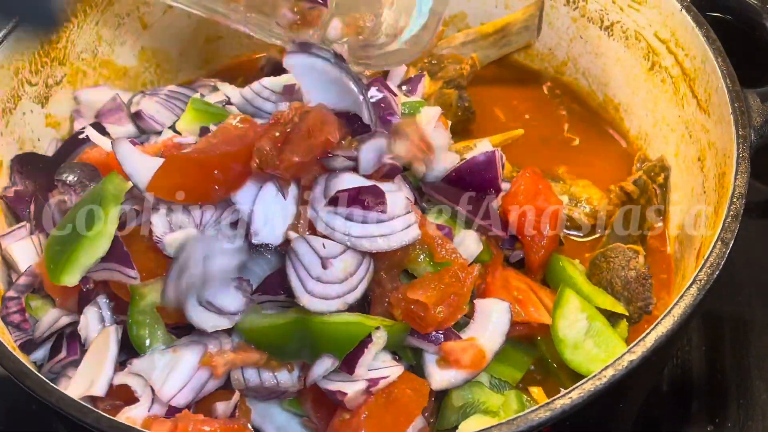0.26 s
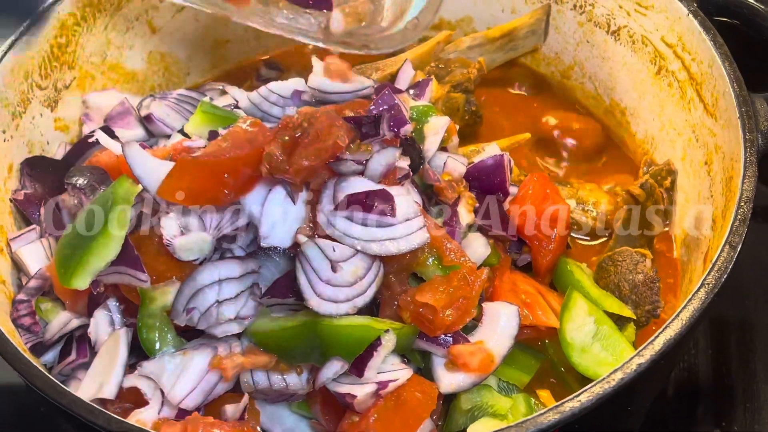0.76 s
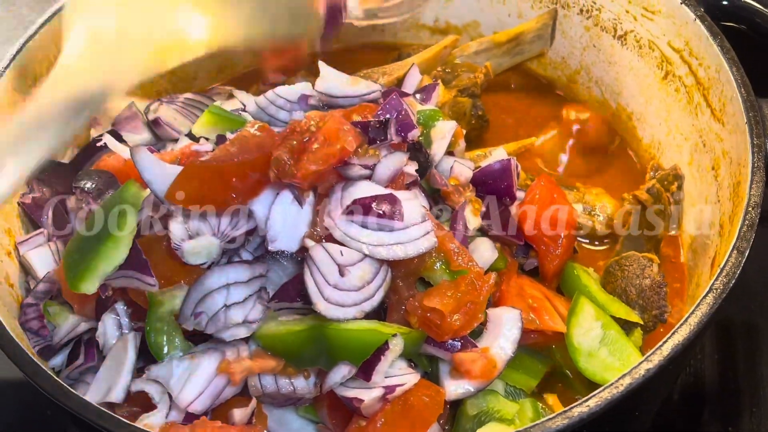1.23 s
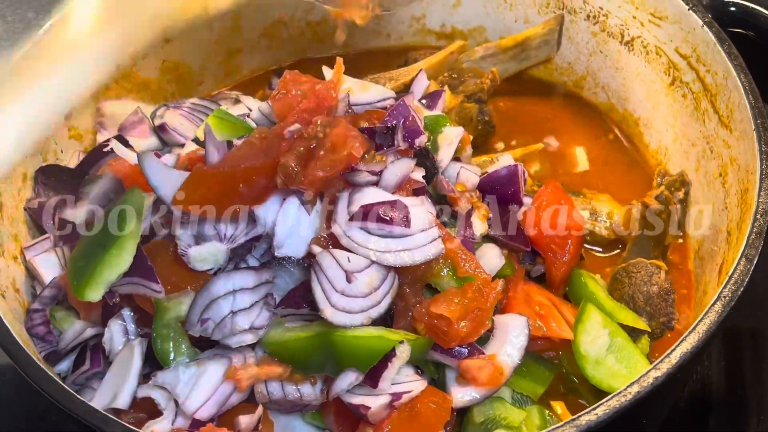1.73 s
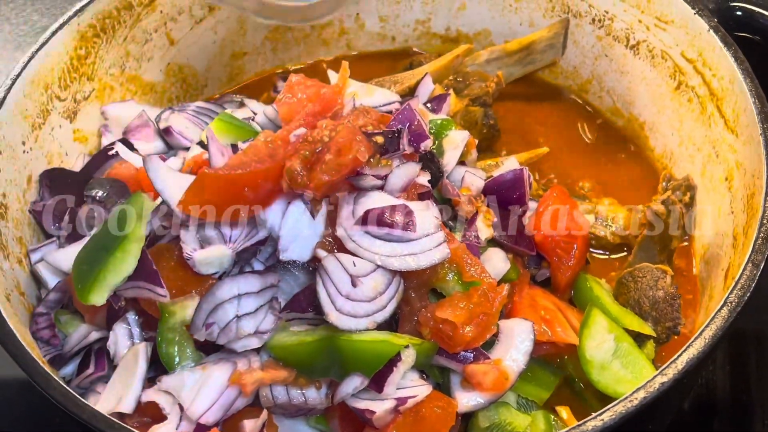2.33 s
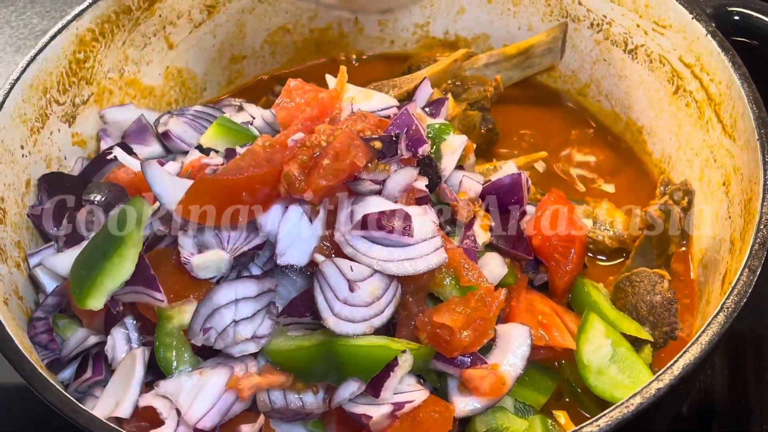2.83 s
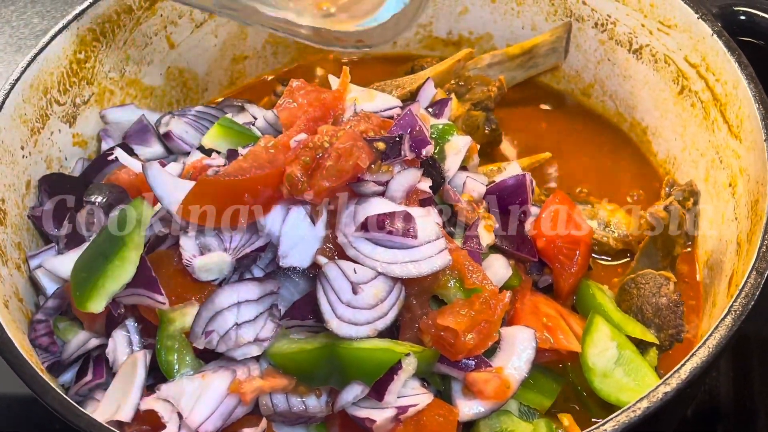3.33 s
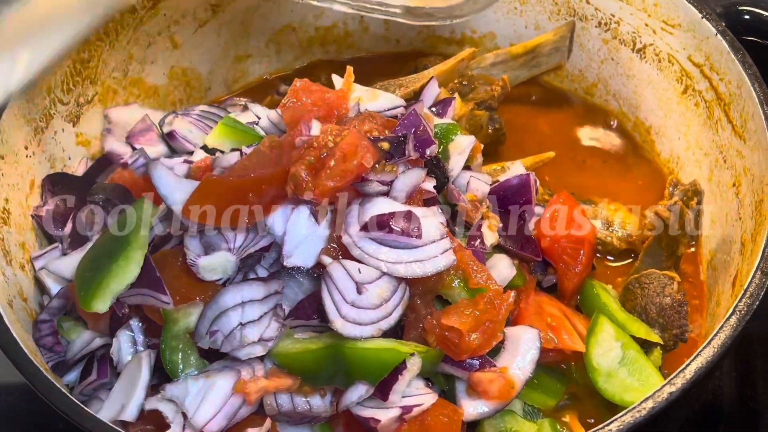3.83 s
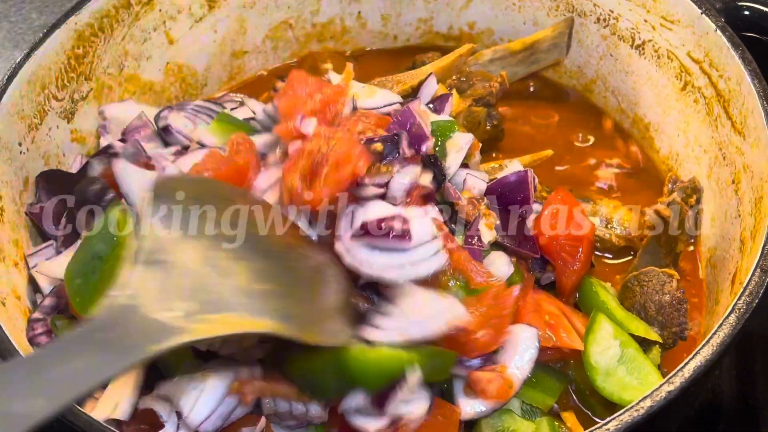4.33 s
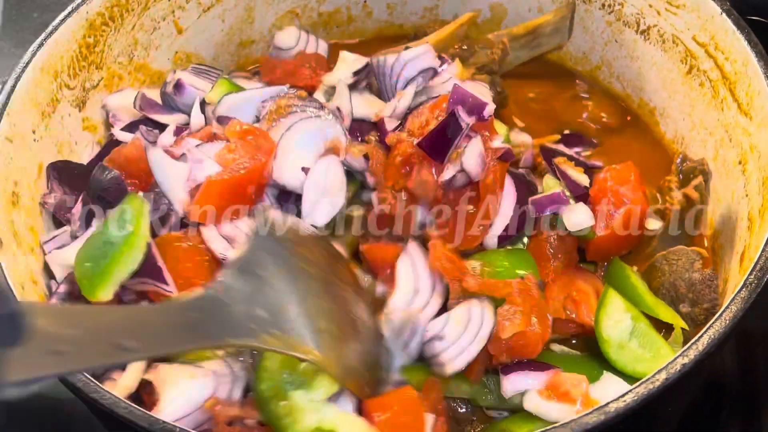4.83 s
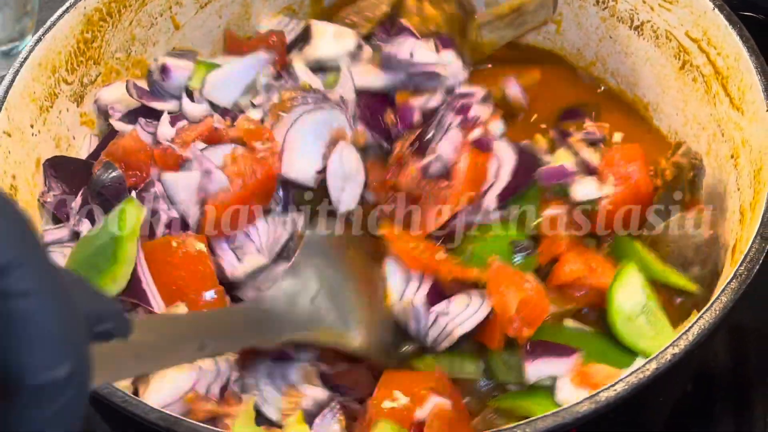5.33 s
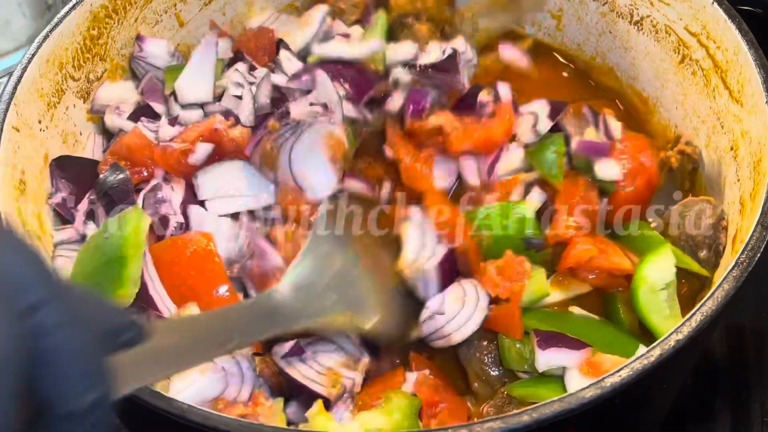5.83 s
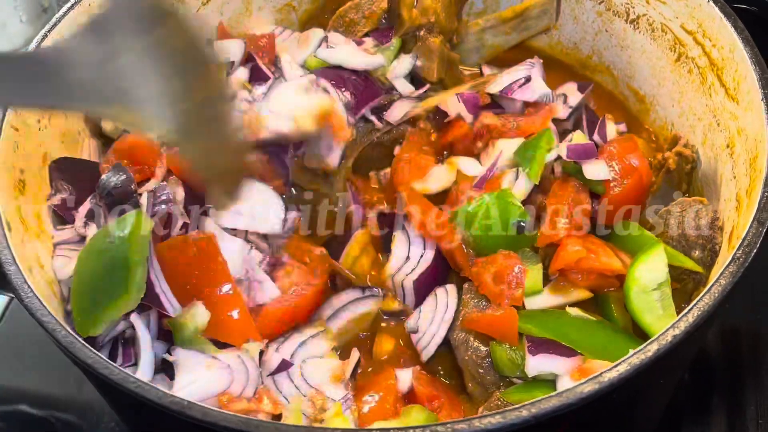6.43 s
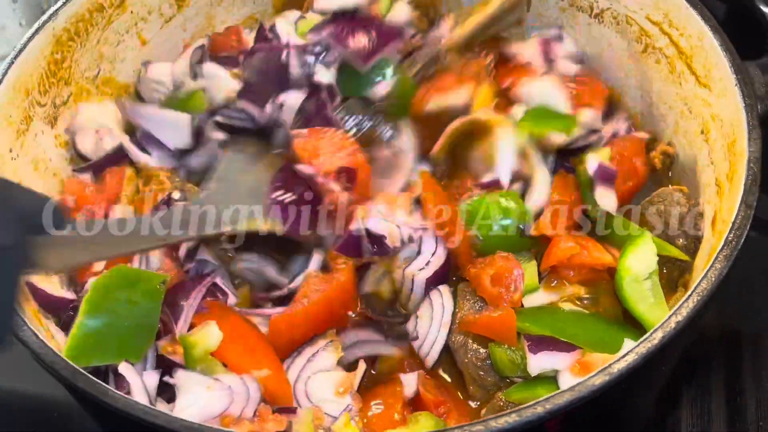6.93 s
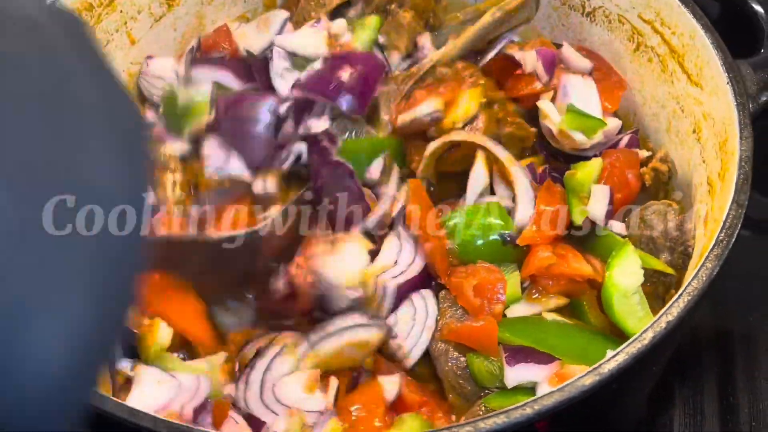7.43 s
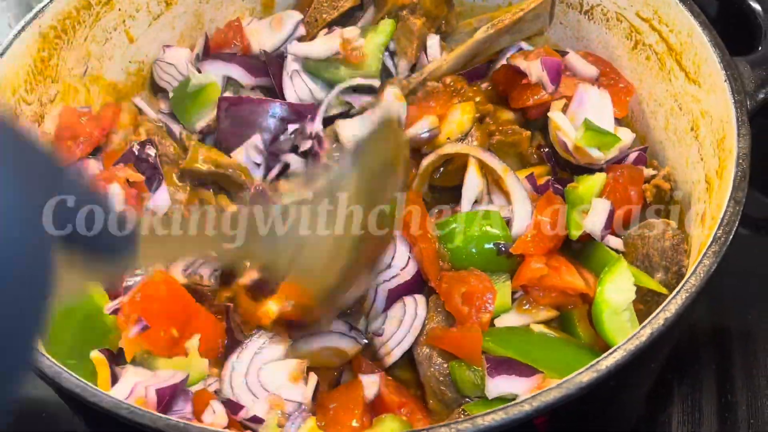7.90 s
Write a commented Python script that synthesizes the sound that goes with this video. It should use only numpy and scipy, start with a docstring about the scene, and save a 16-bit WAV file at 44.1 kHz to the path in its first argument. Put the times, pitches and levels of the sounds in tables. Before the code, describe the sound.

Thick stew bubbles and fizzes while a steel ladle knocks and squeaks on a glass bowl, then stirs wetly with clacks and dull pot thumps.

```python
"""Thick stew bubbles and fizzes in a heavy pot over a low drone, heard from just above the rim.
A steel ladle knocks, rubs and squeaks on a hand-held glass bowl: struck modes and resonant noise.
It then stirs in the last vegetables: grainy wet noise, short clacks on the pot,
and two dull low bumps as the pot rocks and drags. A small kitchen answers with decaying noise."""
import sys
import numpy as np
from scipy import signal
from scipy.fft import rfft, irfft, next_fast_len
from scipy.io import wavfile
from scipy.ndimage import uniform_filter1d, map_coordinates

SR = 44100
rng = np.random.default_rng(int(sys.argv[2]) if len(sys.argv) > 2 else 0)


def materialize(psi):
    """Save the field psi as 16-bit PCM at rate SR to the path in sys.argv[1].

    A 1-D psi becomes a single channel; in a 2-D psi each row is a channel.
    """
    bounded = np.clip(np.atleast_2d(psi).T, -1, 1)
    quanta = np.round(bounded * 32767).astype(np.int16)
    wavfile.write(sys.argv[1], SR, quanta)


N = 359843


def amp(db):
    """Decibels to gain."""
    return 10 ** (np.asarray(db) / 20)


def unit(x):
    """Scale to rms 1."""
    return x / np.sqrt(np.mean(x ** 2) + 1e-20)


def crest(x):
    """Scale so that the loudest 4 ms have rms 1."""
    return x / np.sqrt(uniform_filter1d(x * x, size=176).max() + 1e-20)


def noise(n):
    """White noise of n samples."""
    return rng.standard_normal(n)


def along(points, hz):
    """Read (frequency [Hz], value) points on a log frequency axis."""
    f, v = np.transpose(points)
    return np.interp(np.log(hz + 1), np.log(f + 1), v)


def curves(rows):
    """One value per sample for each column after the time."""
    s, *cols = np.transpose(rows)
    return [np.interp(np.arange(N) / SR, s, c) for c in cols]


def wobble(rate, size):
    """A smooth random curve with rate knots a second."""
    knots = noise(int(size * rate / SR) + 4)
    return map_coordinates(knots, [np.arange(size) * rate / SR])


def filtered(x, response):
    """Shape x by a response given as a function of frequency."""
    n = x.shape[-1]
    m = next_fast_len(n + 8192)
    return irfft(rfft(x, m) * response(np.fft.rfftfreq(m, 1 / SR)), m)[..., :n]


def coloured(x, spectrum):
    """x shaped by a relative spectrum, at rms 1."""
    return unit(filtered(x, lambda hz: amp(along(spectrum, hz))))


def resonant(x, peaks):
    """x through parallel (centre [Hz], width [Hz], level [dB]) resonances, at rms 1."""
    def response(f):
        total = 0
        for k, (centre, width, db) in enumerate(peaks):
            damping = 1j * f * width
            # alternate signs between successive peaks
            total = total + (-1) ** k * amp(db) * damping / (centre * centre - f * f + damping)
        return total
    return unit(filtered(x, response))


def fade(t, t60):
    """Exponential decay, 60 dB down after t60 seconds."""
    return np.exp(-np.log(1000) * t / t60)


def add(track, s, x):
    """Mix x into the track at time s."""
    part = track[max(round(s * SR), 0):][:len(x)]
    part += x[:len(part)]


# stove and kitchen drone over time: (time [s], level [dB])
DRONE_LEVEL = [(0, -53), (1.35, -53), (2.2, -58.5), (3.0, -63), (4.4, -59), (6.4, -60), (8.16, -58.5)]
# colour of the drone: (frequency [Hz], relative density [dB per Hz])
HUM_SPECTRUM = [(20, -21.5), (45, -9.5), (65, -10.5), (100, 2.5), (125, 1.5), (160, -12), (330, -9),
                (700, -24.5), (1500, -39.5), (5000, -27.5), (15000, -53.5)]


def drone():
    """Steady low-heavy noise whose level drifts."""
    return amp(curves(DRONE_LEVEL)[0]) * coloured(noise(N), HUM_SPECTRUM)


def bubble(t, hz, cycles, glide):
    """A bubble rings for some cycles, its pitch rising as it opens."""
    age = t * hz / cycles
    ring = np.sin(2 * np.pi * hz * t * (1 + glide * np.minimum(age, 1)))
    return ring * fade(age, 1.0) * (1 - np.exp(-t * hz))


def bubbles(per_second, hz, spread, cycles, size_db):
    """A random stream of bubbles scattered around one pitch, at rms 1."""
    count = int(per_second * N / SR)
    when, pitch, size = rng.random((count, 3)).T[:, :, None]
    pitch = np.clip(hz * (pitch / (1 - pitch)) ** spread, 200, 9000)
    n = np.arange(SR // 40)
    gain = amp(size_db * np.minimum(-np.log(size), 3))
    waves = gain * bubble(n / SR, pitch, cycles, glide=0.041)
    places = (when * N).astype(int) + n
    return unit(np.bincount(places.ravel(), waves.ravel(), N)[:N])


# colour of the fizz: (frequency [Hz], relative density [dB per Hz])
FIZZ_SPECTRUM = [(300, -26), (1500, -3.5), (3000, 10), (6000, -1), (9000, 8.5), (11500, 4), (13000, -19.5),
                 (16000, -37.5)]


def crackle(per_second, size_db):
    """Tiny films burst as short noise clicks of uneven size, at rms 1."""
    size = amp(size_db * np.minimum(rng.exponential(size=N), 4))
    clicks = (rng.random(N) < per_second / SR) * size
    t = np.arange(SR // 100) / SR
    power = signal.fftconvolve(clicks ** 2, fade(t, 0.0011) ** 2)[:N]
    return coloured(np.sqrt(np.abs(power)) * noise(N), FIZZ_SPECTRUM)


FIZZ_DB, FIZZ_FOLLOWS = -65.5, 0.83  # fizz at average bubbling; its dB per dB of bubbling
SURGE_DB, SURGES_PER_S = 3, 3.1  # depth and knot rate of the random coming and going of the boil
GULP_DB, GULP_HZ = -9, 320  # deep bubbles heaving under the vegetables
# the cold vegetables calm the boil: (time [s], bubbling level before the surges [dB])
BOIL_LEVEL = [(0, -48.5), (1.0, -52), (2.4, -53), (4.1, -59.5), (5.3, -58), (6.3, -64.5), (7.0, -62.5),
              (8.16, -66)]
# colour of the seething sauce: (frequency [Hz], relative density [dB per Hz])
SAUCE_SPECTRUM = [(100, -12.5), (250, 2), (500, -5.5), (800, 17), (1400, -26), (2500, -9.5), (5000, -25),
                  (12000, -69.5)]


def simmer():
    """Thick sauce bubbles in clusters and spits in puffs, while its edge fizzes on the hot wall."""
    bubbling_db = curves(BOIL_LEVEL)[0] + SURGE_DB * wobble(SURGES_PER_S, size=N)
    fizz_db = FIZZ_DB + FIZZ_FOLLOWS * (bubbling_db - bubbling_db.mean())
    cluster = amp(2.5 * wobble(22, size=N))
    large = bubbles(per_second=150, hz=800, spread=.27, cycles=11, size_db=5.5)
    small = bubbles(per_second=150, hz=1500, spread=.2, cycles=13, size_db=6)
    tiny = bubbles(per_second=90, hz=2700, spread=.17, cycles=12, size_db=7)
    spit = resonant(noise(N), [(1100, 900, 0), (2300, 1400, -5)])
    puffs = unit(amp(6 * wobble(90, size=N)) * spit)
    gulps = bubbles(per_second=60, hz=GULP_HZ, spread=.15, cycles=8, size_db=4)
    seethe = coloured(noise(N), SAUCE_SPECTRUM)
    fizz = crackle(per_second=670, size_db=5.0)
    popping = amp(-4.5) * large + amp(-3.5) * small + amp(-11) * tiny + amp(-9) * puffs
    boil = cluster * popping + amp(GULP_DB) * gulps + amp(-8) * seethe
    return amp(bubbling_db) * boil + amp(fizz_db) * fizz


# big bubbles and sucking pops in the sauce:
# (time [s], level before an 8.5 dB trim [dB], nominal pitch [Hz])
SAUCE_PLOPS = [(0.064, -30.5, 847), (0.098, -28.5, 1590), (0.155, -31, 1010), (0.196, -33, 2290),
               (0.632, -30.5, 960), (1.095, -32.5, 1270), (1.291, -36, 730), (1.642, -31.5, 820),
               (1.716, -28, 836), (1.793, -30, 720), (2.277, -37.5, 2050), (2.434, -40, 1250),
               (2.825, -35, 1010), (2.862, -41, 930), (3.735, -37, 775), (4.224, -38.5, 680),
               (4.365, -32.5, 910), (4.392, -32, 1223), (4.688, -36, 980), (4.709, -40, 976),
               (4.785, -38.5, 760), (4.975, -36.5, 1038), (6.261, -42, 1430), (6.445, -40, 716),
               (6.464, -39, 680), (6.827, -33, 1113), (6.999, -37, 950), (8.135, -32, 1060),
               (8.148, -29, 1290)]


def plops():
    """Single large bubbles burst: a gliding ring with a small wet spray of noise."""
    out, t = np.zeros(N), np.arange(SR // 10) / SR
    for s, db, hz in SAUCE_PLOPS:
        spray = fade(t, 0.15) * resonant(noise(len(t)), [(hz, 0.5 * hz, 0)])
        ring = bubble(t, hz * .97, cycles=40, glide=.1)  # starts flat of the nominal pitch and rises
        add(out, s, amp(db - 8.5) * (crest(ring) + amp(-7) * crest(spray)))
    return filtered(out, lambda hz: 1 / (1 + (hz / 7000) ** 6))  # thick sauce softens the burst


SHIMMER_DB, SHIMMER_T60_S = -7, .15  # weak upper modes, relative to the free ring
# colour of a contact's crack: (frequency [Hz], relative density [dB per Hz])
CRACK_SPECTRUM = [(100, -15), (400, -10.5), (700, 3.5), (1100, -3.5), (2500, 0.5), (6000, -1), (9000, 3),
                  (11500, 5.5), (13000, -16), (16000, -22)]


def strike(modes, levels, ring_hz, ring_db, ring_t60, damped_t60, free_db, crack_db, crack_t60, rise):
    """One contact: modes die fast under the ladle, then ring on faintly; each spot differs in colour."""
    t = np.arange(SR // 2) / SR
    hz, db, t60 = np.transpose(modes)[:, :, None]
    size = amp(db + 4 * rng.standard_normal(hz.shape))
    loaded = hz * (1 + 0.0093 * rng.standard_normal(hz.shape))  # the touching ladle detunes the modes
    phase = 2 * np.pi * rng.random(hz.shape)
    damped = fade(t, damped_t60) * np.sin(2 * np.pi * loaded * t + phase)
    # the rim is not quite round, so each free mode beats with a close twin
    twin = np.cos(2 * np.pi * (hz * t * rng.random(hz.shape) / 300 + rng.random(hz.shape)))
    free = amp(free_db) * twin * fade(t, t60) * np.sin(2 * np.pi * hz * t + phase)
    # countless weak modes merge into a crack and a faint shimmer
    crack_decay = fade(t, crack_t60) + amp(free_db + SHIMMER_DB) * fade(t, SHIMMER_T60_S)
    crack = amp(crack_db) * crack_decay * coloured(noise(len(t)), CRACK_SPECTRUM)
    ring_tone = resonant(noise(len(t)), [(ring_hz, ring_hz * 0.015, 0)])
    ring = amp(ring_db) * crest(fade(t, ring_t60) * ring_tone)
    blow = (crest(np.sum(size * (damped + free), 0)) + crack + ring) * (1 - np.exp(-t / rise))
    parts = []
    for band in [(120, 1400), (1400, 4800), (4800, 16000)]:  # body, mid-range, brightness
        sos = signal.butter(2, band, "band", fs=SR, output="sos")
        parts.append(crest(signal.sosfilt(sos, blow)))
    return amp(levels) * [1, -1, 1] @ np.array(parts)  # neighbouring bands add with opposite sign


GLASS_CRACK_DB = -4  # the crack of a tap, relative to the modes
# ladle on the glass bowl: (time [s], mid-range level [dB], body relative to it [dB],
# brightness relative to it [dB], strongest ring [Hz])
BOWL_TAPS = [(0.273, -24, 6.5, 13, 2100), (0.298, -27, 4.5, 16, 8660), (0.403, -35.5, -3.5, 8.5, 9290),
             (0.518, -30.5, -5.5, 3, 4023), (0.734, -31, 9, 18, 6556), (0.748, -26, -2.5, -2.5, 2030),
             (0.827, -29, 4.5, 14, 9100), (0.895, -34.5, 6, 19.5, 9105), (1.434, -19, 4, 5.5, 3290),
             (1.469, -27, -3.5, 16, 8510), (1.493, -35, -14, -3.5, 2060), (1.947, -25, -4.5, 12, 6286),
             (2.054, -21.5, -12.5, 8, 3800), (2.231, -35, -11, 0.5, 2100), (2.51, -20.5, -9.5, 5.5, 4540),
             (2.907, -18.5, -6, 5, 2050), (2.932, -20.5, 0.5, 0, 6080), (3.079, -23, -12, 12.5, 6507),
             (3.374, -38.5, 8, 17.5, 7040), (3.414, -20.5, -7.5, 4.5, 6695), (3.614, -41.5, 4, 5, 1982),
             (3.933, -17.5, -2.5, 0, 3370), (3.956, -17.5, -19, 2.5, 2053),
             (4.078, -39.5, -3.5, -5.5, 3140)]
# modes of the glass bowl: (frequency [Hz], relative level [dB], t60 of the free ring [s])
GLASS_MODES = [(640, -5, .1), (770, 0, .14), (1230, -10, .2), (1641, 1.5, .38), (2034, 2, .47),
               (2400, -6, .15), (2720, -1, .24), (3310, 0, .23), (3827, -4, .44), (4082, -2, .42),
               (4410, -8, .3), (4502, -4, .3), (5130, -6, .25), (5221, -4, .34), (5470, -8, .22),
               (6240, 1, .14), (6650, -2, .2), (6790, -5, .2), (7219, -1, .34), (7490, -6, .25),
               (7860, -3, .22), (8330, -5, .22), (8473, -4, .28), (9006, 0, .26), (9570, -5, .22),
               (10940, -2, .2)]
# ladle rubbing along the glass: (centre time [s], level [dB], half length [s])
GLASS_RUBS = [(0.32, -41, 0.043), (1.193, -38.5, 0.018), (2.504, -33, 0.0061), (2.688, -33, 0.028),
              (3.583, -39, 0.025), (3.679, -44.5, 0.013)]
# the rubbing catches and squeaks: (centre time [s], level [dB], half length [s], pitch [Hz])
GLASS_SQUEAKS = [(0.317, -30.5, .012, 2730), (0.369, -28.5, .02, 2760), (0.848, -33, .012, 2700),
                 (1.18, -43.5, .02, 3480), (1.188, -42.5, .024, 2120), (2.505, -32.5, .006, 6080),
                 (2.63, -45.5, .018, 2170), (2.68, -32, 0.014, 2710), (2.705, -35.5, 0.026, 2050)]


def bowl():
    """Knocks excite the glass modes; rubbing feeds them noise, and squeaks are wavering tones."""
    out, t = np.zeros(N), np.arange(N) / SR
    for s, db, body_db, bright_db, hz in BOWL_TAPS:
        levels = (db + body_db, db, db + bright_db)
        tap = strike(GLASS_MODES, levels, hz, ring_db=-7, ring_t60=0.054, damped_t60=0.061,
                     free_db=-20.5, crack_db=GLASS_CRACK_DB, crack_t60=0.068, rise=0.00071)
        add(out, s + 0.0015, tap)
    # rubbing favours the low modes by 4 dB an octave
    peaks = [(hz, 35, db - 4 * np.log2(hz / 1000)) for hz, db, _ in GLASS_MODES]
    rub = resonant(noise(N), peaks)
    out += rub * sum(amp(db) * np.exp(-((t - s) / half) ** 2) for s, db, half in GLASS_RUBS)
    for s, db, half, hz in GLASS_SQUEAKS:
        swell = signal.windows.hann(int(4 * half * SR))
        # uneven stick and slip shakes the pitch
        pitch = hz * (1 + wobble(300, size=len(swell)) / 60)
        tone = unit(np.sin(2 * np.pi * np.cumsum(pitch) / SR))
        add(out, s - 2 * half, amp(db) * swell * tone)
    return out


PUSH_T60_S, PUSH_HZ = .05, 450  # a push dies fast and has no treble
# heavy taps push air below the vessel: (time [s], level [dB])
AIR_PUSHES = [(.300, -29), (.829, -38.5), (.897, -33), (1.947, -35.5), (2.054, -25.5), (2.513, -39),
              (2.936, -36.5), (3.417, -41.5), (6.721, -37)]


def pushes():
    """A heavy tap shoves the whole vessel: one low puff of air."""
    out, t = np.zeros(N), np.arange(SR // 4) / SR
    low_band = signal.butter(2, [75, PUSH_HZ], "band", fs=SR, output="sos")
    for s, db in AIR_PUSHES:
        jolt = fade(t, PUSH_T60_S) * noise(len(t))
        add(out, s, amp(db) * crest(signal.sosfilt(low_band, jolt)))
    return out


CLACK_BODY_DB = -2  # the body of every clack, relative to its mid-range
# ladle on the pot and on crisp vegetables:
# (time [s], mid-range level [dB], brightness relative to it [dB], strongest ring [Hz])
POT_CLACKS = [(1.305, -42, -23, 1904), (1.846, -41.5, -21, 3250), (4.44, -47.5, 2, 4050),
              (4.46, -35.5, -8.5, 1220), (4.607, -53.5, -15, 1390), (4.775, -49.5, -3.5, 2120),
              (4.866, -48, -5, 2980), (5.274, -21, -4, 2093), (5.56, -46.5, -6, 1780),
              (5.582, -26.5, -7, 3280), (5.911, -43, -9, 2300), (5.946, -36.5, -10, 3510),
              (6.221, -48.5, -19, 2710), (6.312, -57.5, 4, 2820), (6.556, -47, -1.5, 2090),
              (6.679, -40, 0, 2230), (6.722, -15.5, -7.5, 1513), (7.003, -51, 3, 1500),
              (7.064, -56, -5, 990), (7.137, -43, 1.5, 2720), (7.294, -45, -16, 1630),
              (7.478, -53, -8, 1760), (7.72, -42, -25, 3050), (7.741, -44.5, -28, 2600)]
# modes of the cast pot, damped by the stew: (frequency [Hz], relative level [dB], t60 [s])
POT_MODES = [(607, -5.5, 0.27), (668, 1, 0.13), (978, -3, 0.068), (1279, -3, 0.18), (1810, 0, 0.023),
             (2000, -10, 0.021), (2730, 8, 0.022), (3410, 4.5, .06), (5080, -12.5, .05)]


def ladle():
    """Short clacks of steel excite the quickly damped modes of the filled pot."""
    out = np.zeros(N)
    for s, db, bright_db, hz in POT_CLACKS:
        levels = (db + CLACK_BODY_DB, db, db + bright_db)
        clack = strike(POT_MODES, levels, hz, ring_db=1.0, ring_t60=0.017, damped_t60=0.032,
                       free_db=-9, crack_db=7.5, crack_t60=0.023, rise=0.00054)
        add(out, s + 0.00023, clack)
    return filtered(out, lambda hz: 1 / (1 + (hz / 12000) ** 8))  # sauce on the ladle dulls the top


DIP_FALL_S, DIP_BELOW_HZ = .03, 800
# the bass drops away briefly and creeps back: (time [s], nominal depth [dB], recovery [s])
BASS_DIPS = [(1.49, 9, .2), (2.085, 21, .24), (2.54, 15, .3)]


def dipped(x):
    """x with its bass falling away and recovering at each dip."""
    t = np.arange(N) / SR
    loss_db = np.zeros(N)
    for s, depth_db, recovery in BASS_DIPS:
        fall = np.clip((t - s) / DIP_FALL_S, 0, 1)
        loss_db += depth_db * fall * np.exp(-((t - s) / recovery) ** 2)
    bass = filtered(x, lambda hz: 1 / (1 + (hz / DIP_BELOW_HZ) ** 4))
    return x + (amp(-loss_db) - 1) * bass


RUSTLE_HZ, RUSTLE_WIDTH_HZ = 5200, 2100  # onion layers brushing past each other
SNAPS_PER_S, SNAP_DB = 39, -9.5  # crisp pieces giving way during a slide
# the ladle slides through wet vegetables: (time [s], level before a 7 dB trim [dB], rise [s],
# t60 [s], centre [Hz], crisp rustle relative to the slide [dB])
WET_SLIDES = [(4.28, -51.5, 0.0092, .1, 2910, -13.5), (4.42, -46, 0.018, 0.4, 1420, 0),
              (4.679, -39.5, 0.018, 0.14, 1370, -19), (5.92, -48, 0.032, 0.89, 1410, -14),
              (6.535, -46, .028, 0.098, 1920, -10), (6.68, -32.5, 0.0057, 0.34, 2130, -7),
              (6.84, -39.5, .07, 0.39, 944, -14), (7.139, -39.5, 0.015, 0.16, 2670, -10),
              (7.17, -38, 0.032, 0.34, 1180, -28), (7.35, -47.5, 0.073, 0.27, 1240, -6),
              (7.968, -36, .0013, 0.25, 5170, -10), (8.09, -46.5, .047, 0.49, 1160, -12)]


def stirring():
    """Each slide is a lumpy rush of wet noise, with rustle and snaps, that swells and drains away."""
    out, t = np.zeros(N), np.arange(int(.7 * SR)) / SR
    for s, db, rise, t60, hz, rustle_db in WET_SLIDES:
        lumps = amp(3.5 * wobble(300, size=len(t)) + 3.5 * wobble(50, size=len(t)))
        wet = resonant(lumps * noise(len(t)), [(hz, .3 * hz, 0)])
        crisp = resonant(lumps * noise(len(t)), [(RUSTLE_HZ, RUSTLE_WIDTH_HZ, 0)])
        breaks = (rng.random(len(t)) < SNAPS_PER_S / SR) * rng.random(len(t)) ** 2
        bursts = signal.fftconvolve(breaks, fade(t, 0.011))[:len(t)]
        snaps = resonant(bursts * noise(len(t)), [(2380, 2300, 0)])
        grains = wet + amp(rustle_db) * crisp + amp(SNAP_DB) * snaps
        # thin out the bass below 500 Hz and close the top above 11 kHz
        rush = unit(filtered(grains, lambda f: f ** 2 / (f ** 2 + 500 ** 2) / (1 + (f / 11000) ** 12)))
        swell = (1 - np.exp(-t / rise)) * fade(t, t60)
        add(out, s, amp(db - 7) * rush * swell / swell.max())
    return out


STOVE_RING_DB = -24  # the free ring that outlasts a bump
# the pot rocks on its support: (time [s], level before a 2 dB lift [dB], t60 [s])
POT_BUMPS = [(5.208, -15.5, 0.12), (5.223, -32, 0.03), (5.307, -23.5, 0.055), (5.742, -11, 0.12),
             (5.778, -15.5, 0.12), (5.805, -28, 0.54)]
# modes of pot and stove top together: (frequency [Hz], relative level [dB], t60 of the free ring [s])
STOVE_MODES = [(108, 2.5, 0.66), (132, 10.5, 0.17), (202, -3, 0.38), (275.5, -5.5, 0.14), (381, 7, 0.13),
               (446, 6, 0.053), (527.4, -13.5, 1), (602, 7, 0.025), (690, 12, 0.085), (776, -15, 0.026),
               (1034, -37.5, 0.073)]
# colour of the judder: (frequency [Hz], relative density [dB per Hz])
THUD_SPECTRUM = [(30, -38.5), (60, -40), (110, 0.5), (300, -7.5), (800, -2.5), (1150, -17.5), (2000, -22.5),
                 (4000, -35.5), (9000, -37), (14000, -54)]
# between bumps the pot drags over the stove:
# (start time [s], end time [s], level before a 2.5 dB lift [dB])
POT_DRAGS = [(5.281, 5.343, -27.5), (5.328, 5.468, -34.5), (5.769, 5.834, -26)]


def bumps():
    """The heavy pot drops on the stove top and rings low; drags feed noise to the same modes."""
    out, t = np.zeros(N), np.arange(SR // 2) / SR
    hz, mode_db, ring_t60 = np.transpose(STOVE_MODES)[:, :, None]
    for s, db, t60 in POT_BUMPS:
        size = amp(mode_db + 2 * rng.standard_normal(hz.shape))
        decay = fade(t, np.minimum(ring_t60, 0.98 * t60)) + amp(STOVE_RING_DB) * fade(t, ring_t60)
        modes = size * decay * np.sin(2 * np.pi * (hz * t + rng.random(hz.shape)))
        judder = fade(t, t60) * coloured(noise(len(t)), THUD_SPECTRUM)
        thud = crest(modes.sum(0)) + amp(-4.0) * crest(judder)
        add(out, s, amp(db + 2.0) * (1 - np.exp(-t / 0.00091)) * thud)
    drag_peaks = [(f, 5 / t60, level) for f, level, t60 in STOVE_MODES]
    for start, end, db in POT_DRAGS:
        swell = signal.windows.hann(int((end - start) * SR)) ** 0.16
        slips = np.pad(swell * noise(len(swell)), (0, len(t) - len(swell)))
        scrape = coloured(np.roll(slips, SR // 200), THUD_SPECTRUM)  # 5 ms behind the modes
        groan = resonant(slips, drag_peaks) + amp(-1.5) * scrape
        dull = filtered(groan, lambda f: 1 / (1 + (f / 900) ** 2))
        add(out, start, amp(db + 2.5) * crest(dull))
    return signal.sosfilt(signal.butter(5, 74, "high", fs=SR, output="sos"), out)


# decay of the room: (frequency [Hz], t60 [s])
ROOM_DECAY = [(150, 0.7), (1000, 0.18), (4000, 0.25), (9000, 0.17), (15000, .12)]
# stereo spread of the room: (frequency [Hz], side over mid [ratio])
ROOM_SPREAD = [(100, .35), (300, .7), (600, 1.3), (1400, 1.5), (2300, .5), (7000, .35), (15000, .5)]


def kitchen(x):
    """The room's answer is decaying noise, most different between the ports in the mid-range."""
    hz, t, z = signal.stft(rng.standard_normal((2, SR // 2)), SR, nperseg=256)
    decaying = z * fade(t, along(ROOM_DECAY, hz)[:, None])
    tail = signal.istft(decaying, SR, nperseg=256)[1]
    mid, side = tail / np.linalg.norm(tail[0])
    side = filtered(side, lambda f: along(ROOM_SPREAD, f))
    delayed = np.pad(x, (SR // 200, 0))[None]  # the answer starts 5 ms late
    return signal.fftconvolve(delayed, np.array([mid + side, mid - side]), axes=1)[:, :N]


def scene():
    """All sources sit close together under the microphone."""
    stew = simmer() + plops() + stirring()
    knocks, thuds = bowl() + ladle(), bumps()
    send = amp(-23) * knocks + amp(-18) * thuds + amp(-8) * stew
    return dipped(drone() + stew + knocks + pushes() + thuds + kitchen(send))


TOP_HZ = 16700  # upper limit of the band
# phase between the microphone ports: (frequency [Hz], lead of the left [rad])
PORT_LEAD = [(100, 0), (400, .25), (860, .3), (1810, -.35), (2500, .1), (3360, .6), (4000, .35), (8400, .1),
             (9470, -2), (10600, -3.6), (11700, -5.8), (13500, -9.3), (16500, -12.7)]
# level between the microphone ports: (frequency [Hz], left minus right [dB])
PORT_LEVEL = [(100, .8), (300, 2), (1200, 2.5), (2300, 0), (10000, 0)]


def record(dry):
    """Two ports differ in level and phase; peaks are rounded off and the band is limited."""
    def port(hz, side):
        return amp(side * along(PORT_LEVEL, hz)) * np.exp(1j * side * along(PORT_LEAD, hz))
    # each port takes half of the difference
    ports = filtered(dry, lambda hz: np.array([port(hz, .5), port(hz, -.5)]))
    rounded = ports / (1 + np.abs(ports) ** 6) ** (1 / 6)
    return filtered(rounded, lambda hz: hz < TOP_HZ)


dry = scene()
out = record(dry)
materialize(out)
```